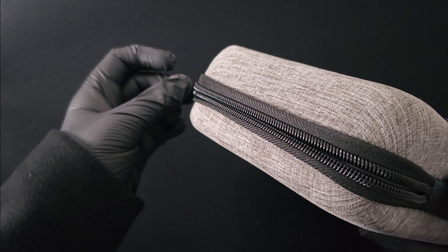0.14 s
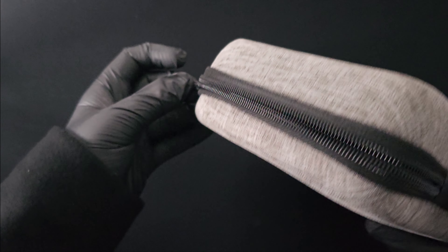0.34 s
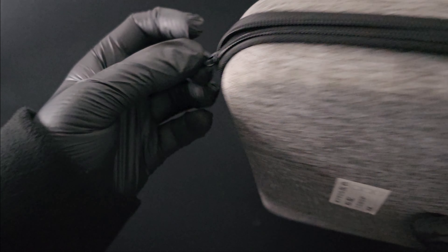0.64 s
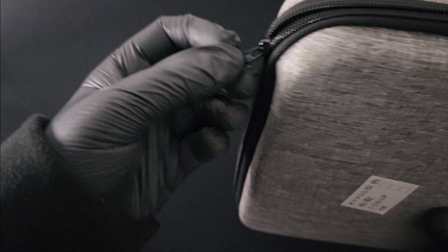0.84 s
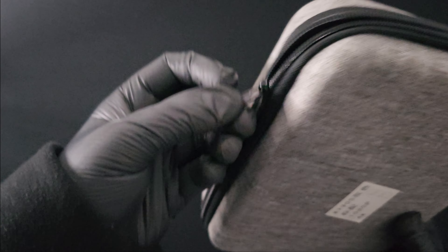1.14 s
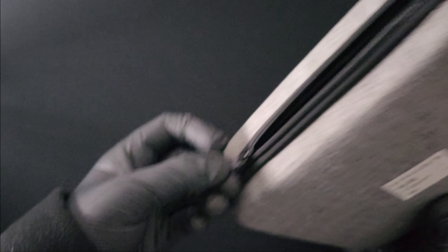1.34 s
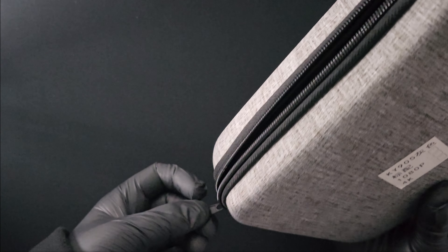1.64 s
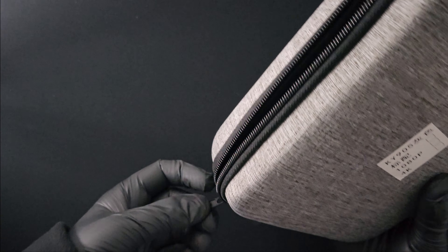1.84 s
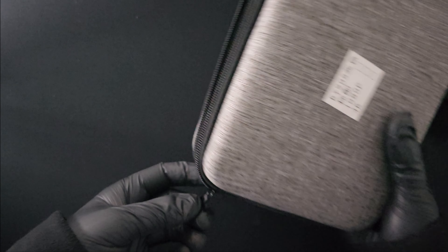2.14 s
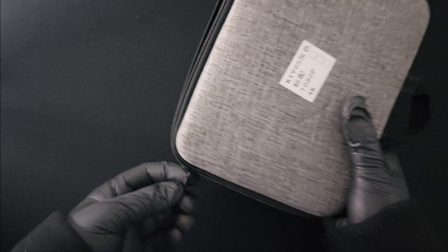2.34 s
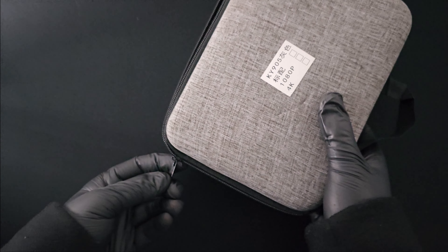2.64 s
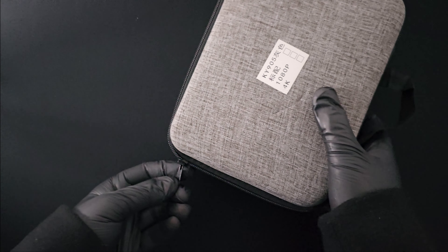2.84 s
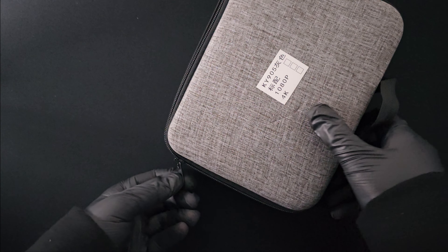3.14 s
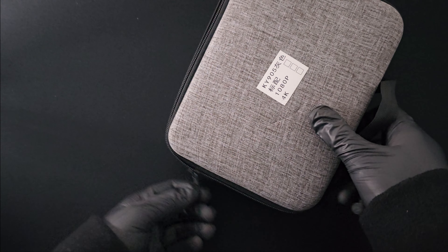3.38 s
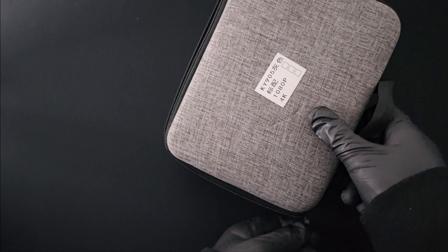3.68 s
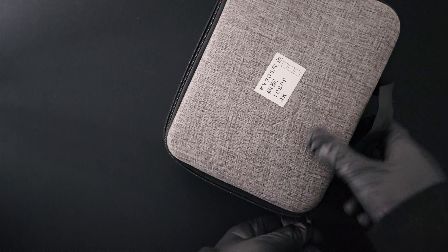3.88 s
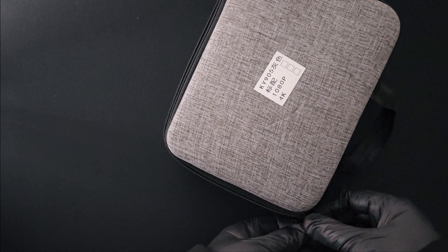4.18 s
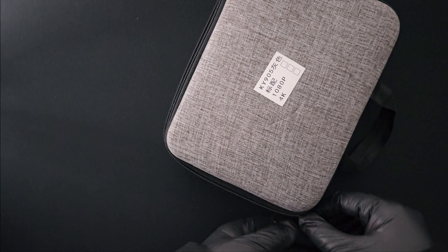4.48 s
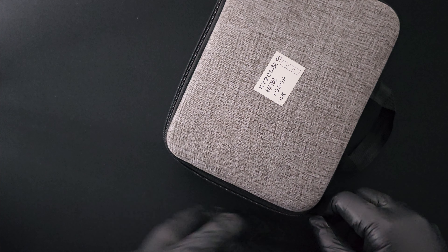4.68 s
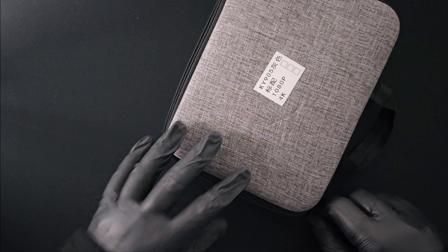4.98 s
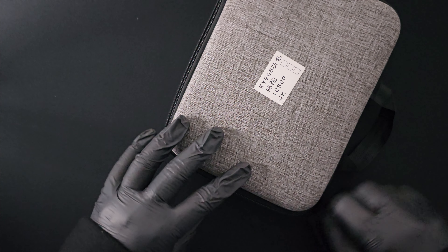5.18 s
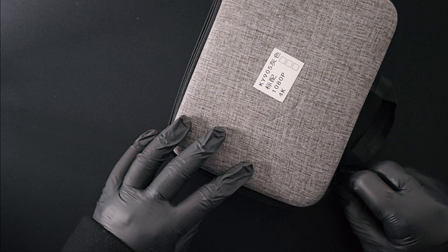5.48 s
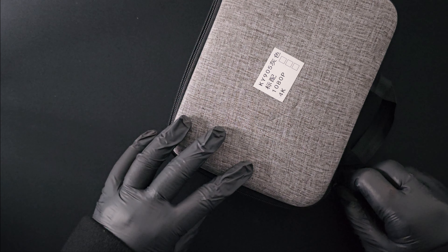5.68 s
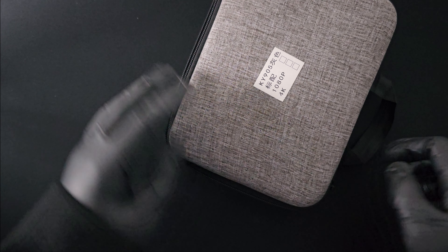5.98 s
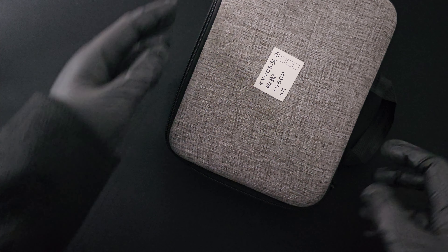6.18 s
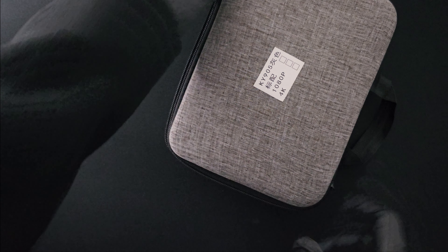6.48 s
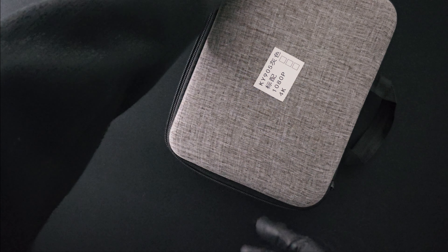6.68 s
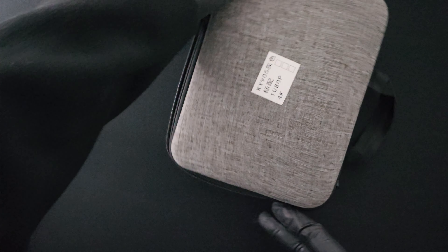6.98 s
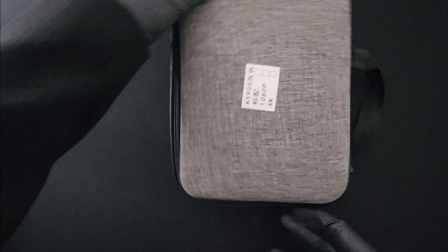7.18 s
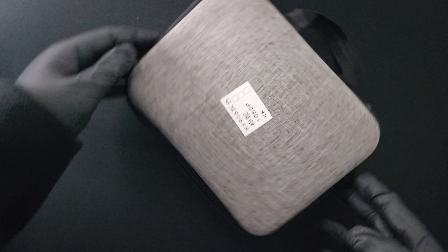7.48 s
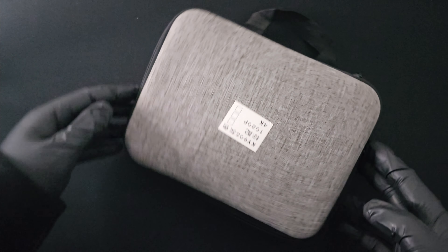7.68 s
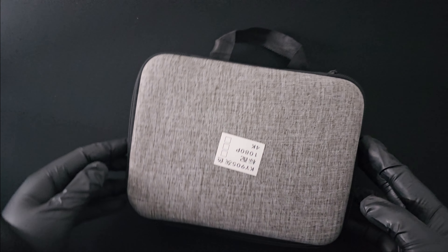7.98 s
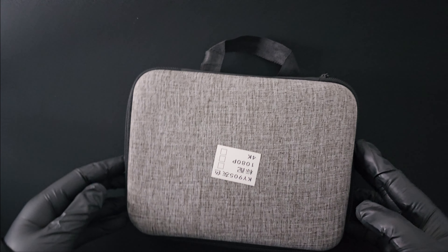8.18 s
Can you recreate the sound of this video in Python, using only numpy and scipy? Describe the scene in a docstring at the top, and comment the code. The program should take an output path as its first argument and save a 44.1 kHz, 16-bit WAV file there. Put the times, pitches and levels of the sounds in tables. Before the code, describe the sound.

Very close stereo sound in a quiet room: gloved hands brush a stiff cloth-covered case, the pull tab ticks, and a zipper rips open with a buzzing, rising rasp. The case thumps hollowly onto a table, a second brief zip follows sharp tab clacks, then a short, quickly fading third zip with rubbery glove rasp. Soft rustling leads to a smooth sliding drag as the case is turned.

```python
"""Unzipping a stiff case, close up

On a table in a quiet room, gloved hands unzip a stiff, fabric-covered case close to a stereo pair of microphones.
In three pulls the slider trips over the coil teeth: each kick drives the resonances of the hollow shell.
Shaped noise makes the cloth strokes, tape hiss and rubber rasp; decaying modes make the thumps and tab clicks.
At the end the case is slid round on the table; faint room tone and a deep hum lie underneath."""
import sys
import numpy as np
from scipy import signal
from scipy.fft import rfft, irfft, next_fast_len
from scipy.io import wavfile
from scipy.ndimage import uniform_filter1d

SR = 44100
rng = np.random.default_rng(int(sys.argv[2]) if len(sys.argv) > 2 else 0)


def transcribe(signal):
    """Save signal, clipped to [-1, 1], as a 16-bit WAV file at the path in sys.argv[1]."""
    frames = np.atleast_2d(signal).T
    limited = np.clip(frames, -1, 1)
    pcm = np.round(limited * 32767).astype(np.int16)
    wavfile.write(sys.argv[1], SR, pcm)


N = 367337


def amp(db):
    """Decibels to gain."""
    return 10 ** (np.asarray(db) / 20)


def evened(x):
    """Scales to unit rms."""
    return x / np.sqrt(np.mean(x ** 2) + 1e-20)


def steadied(x, size=1800):
    """Scales to unit rms over every short stretch of size samples."""
    power = np.mean(np.atleast_2d(x) ** 2, 0)
    return x / np.sqrt(abs(uniform_filter1d(power, size)) + 1e-9)


def read(points, hz):
    """Reads a spectrum on a log-frequency axis."""
    f, value = np.transpose(points)
    return np.interp(np.log(hz + 1), np.log(f + 1), value)


def add(mix, s, sound):
    """Adds a sound into the stereo mix at time s."""
    part = mix[:, round(s * SR):][:, :sound.shape[-1]]
    part += sound[..., :part.shape[1]]


def pair(size, likeness):
    """White noise for two microphones, partly alike."""
    left, other = rng.standard_normal((size, 2)).T
    c = np.clip(likeness, 0, 1)
    return np.array([left, c * left + np.sqrt(1 - c * c) * other])


def colour(x, points):
    """Gives x a spectrum at unit rms, falling away steeply below its first point."""
    size = next_fast_len(x.shape[-1] + 1024)
    hz = np.fft.rfftfreq(size, 1 / SR)
    gain = amp(read(points, hz)) * np.minimum(hz / points[0][0], 1) ** 2
    return evened(irfft(rfft(x, size) * gain, size)[..., :x.shape[-1]])


def resonate(x, peaks):
    """Passes x through parallel resonances (frequency [Hz], width [Hz], level [dB])."""
    return sum(amp(db) * signal.lfilter(*signal.iirpeak(hz, hz / width, SR), x) for hz, width, db in peaks)


def panel(x, peaks):
    """Meets each resonance twice, by the tape and by the wall, with deep valleys between."""
    out = 0
    for hz, width, db in peaks:
        once = resonate(x, [(hz, width, db)])
        out = out + resonate(once, [(hz, width, 0)])
    return out


def ring(modes, t):
    """Free decay of struck modes (frequency [Hz], level [dB], t60 [s])."""
    return sum(amp(db - 60 * t / t60) * np.sin(2 * np.pi * hz * t) for hz, db, t60 in modes)


def wander(t, step):
    """A random line that takes a new course every step, its turning points of unit spread."""
    turns = rng.standard_normal(400)
    return np.interp(t / max(step, .005), np.arange(len(turns)), turns)


EDGE_DB = 25.5  # drop at either end of a hand movement, besides the fade of first contact


def swell(length, attack, release):
    """A movement of the hand rises, holds and eases off: sample times [s] and level [dB]."""
    t = np.arange(0, length, 1 / SR)
    rising = np.maximum(1 - t / attack, 0)
    easing = np.maximum(1 - (length - t) / release, 0)
    touching = np.clip(4 * t / attack, .05, 1)  # the first contact fades in
    return t, 20 * np.log10(touching) - EDGE_DB * (rising ** 2 + easing ** 2)


def gated(x):
    """Softens both ends of a sound over 4 ms."""
    t = np.arange(x.shape[-1]) / SR
    return x * np.minimum(np.minimum(t, t[-1] - t) / .004, 1)


# The quiet room: (frequency [Hz], relative density [dB per Hz])
ROOM_TONE = [(15, -23.5), (25, -17.5), (52, -21.5), (75, -15.5), (164, -32.5), (221, -23), (359, -30),
             (648, -34), (895, -34), (15500, -57.5)]
# Deep hum: (frequency [Hz], rms level [dB])
HUM = [(32.3, -78.5), (48.4, -80)]
ROOM_TONE_DB = -76


def background():
    """Faint room tone is shaped noise; the deep hum under it is steady sines."""
    t = np.arange(N) / SR
    hum = sum(amp(db) * np.sqrt(2) * np.sin(2 * np.pi * (hz * t + rng.random())) for hz, db in HUM)
    return amp(ROOM_TONE_DB) * colour(pair(N, 0.27), ROOM_TONE) + hum


# Coarse scraping of cloth: (frequency [Hz], relative density [dB per Hz])
SCRAPE = [(350, -30), (600, 3), (850, 8.5), (1050, 4), (1350, 8), (1650, 2), (2200, 2), (3000, -31.5)]
# Fine hiss of the fibres: (frequency [Hz], relative density [dB per Hz])
FIBRE = [(1500, 0), (2500, 2), (4200, 3.5), (7500, -1), (10000, -14.5), (15000, -21)]
# The topmost treble of cloth and tape: (frequency [Hz], relative density [dB per Hz])
SHEEN = [(6000, -20), (9300, -8), (11500, -10), (13000, -11), (15800, -14.5)]


def rub(level, hollow, press_db, scrape_db, sheen_db, grain_db):
    """Countless fibres catch and slip; the coarser slips scrape and stir the hollow shell."""
    size = len(level)
    catches = amp(grain_db * evened(uniform_filter1d(rng.standard_normal(size), size=70)))
    shell_band = signal.butter(3, [115, 650], "band", fs=SR, output="sos")
    shell = signal.sosfilt(shell_band, resonate(catches * pair(size, 0.96), hollow))
    coarse = colour(catches ** 1.6 * pair(size, 0.24), SCRAPE)
    fine = catches * pair(size, 0.039)
    sound = amp(press_db) * steadied(shell, size=6000) + amp(scrape_db) * coarse
    sound += colour(fine, FIBRE) + amp(sheen_db) * colour(fine, SHEEN)
    return amp(level) * gated(sound)


# Gloves and sleeves stroking the cloth: (start [s], length [s], attack [s], release [s],
# fibre hiss [dB], pressure on the shell re hiss [dB], sheen re hiss [dB])
STROKES = [ (0.296, 0.31, 0.045, 0.34, -65.5, -12.5, 1), (0.334, 0.1, 0.011, 0.047, -91, 24, -5),
           (0.44, 0.082, 0.0094, 0.034, -84.5, 17, -3), (0.514, 0.18, 0.051, .08, -86.5, 11, -16),
           (0.589, 0.81, 0.012, 0.48, -75, -2.5, -4), (0.963, 0.6, 0.072, .12, -89.5, 15.5, 4),
           (1.523, 0.2, 0.026, 0.11, -69, 17.5, -3), (1.688, 0.35, 0.034, 0.24, -86, 10, -25),
           (1.921, 0.25, 0.033, 0.16, -70.5, -4.5, -2.5), (2.106, 0.26, 0.046, 0.18, -68.5, -4.5, -3.5),
           (2.248, 0.72, 0.1, 0.33, -80.5, 5.5, -6), (2.55, 0.052, 0.012, 0.021, -70, 12.5, -4),
           (2.579, 0.14, 0.02, 0.24, -74, 2.5, 2), (2.811, 0.51, 0.19, 0.17, -58.5, -9.5, -5.5),
           (3.202, 0.66, 0.023, 0.21, -72.5, 15, -8), (3.784, 0.22, 0.032, 0.025, -73.5, 6, -7),
           (3.892, 0.27, 0.042, 0.18, -66.5, -6, 2.5), (4.197, 0.47, 0.061, 0.1, -76.5, -1, 3),
           (4.64, .27, 0.04, 0.064, -71.5, -5.5, -4), (4.831, 0.47, 0.073, 0.46, -64.5, -11, 0),
           (5.106, 0.35, 0.0065, 0.042, -74.5, 1, 2), (5.202, 0.245, 0.14, 0.098, -58.5, -7, -7),
           (5.311, 0.16, 0.042, 0.16, -47.5, -30, 2), (5.469, 0.18, 0.03, 0.08, -82, 7, 9),
           (5.595, 0.38, 0.066, 0.057, -82, 3, -7.5), (5.782, 0.14, 0.13, 0.1, -66, 2, 6),
           (5.883, 0.4, 0.026, 0.17, -78, 1, -6), (6.065, 0.35, 0.09, 0.084, -74.5, -2.5, -1),
           (6.23, 0.65, 0.22, 0.13, -67, -9.5, -4), (6.793, 0.19, 0.061, 0.079, -74.5, -2, 0),
           (6.875, 0.18, 0.027, 0.033, -95.5, 25.5, -4), (6.981, 0.098, 0.015, 0.089, -82, 22, -5), ]
# A pinched pull tab drags briefly along the tape: the columns of STROKES
TUGS = [(4.079, .161, .015, .035, -68, -1, 13.5), (4.59, .21, .02, .04, -83, 11, 0),
        (5.855, .12, .012, .09, -80, 11, 0)]
# Shell under a rubbing hand while lifted: (frequency [Hz], width [Hz], level [dB])
LIFTED_SHELL = [(216, 19, 9.5), (278, 60, 6), (380, 67, -3)]
# The same shell resting on the table: (frequency [Hz], width [Hz], level [dB])
RESTING_SHELL = [(150, 12, 8.5), (211, 6.5, 6), (270, 36, -0.5), (358, 88, -6.5), (430, 53, -10.5)]
# Resonances under the pinched tab: (frequency [Hz], width [Hz], level [dB])
TAB = [(391, 66, 3), (425, 10, -5)]
RESTING_S = 2.56  # strokes from here on find the case touching the table
SCRAPE_DB, SCRAPE_PER_PRESSURE = -1.5, 0.47  # scraping re hiss at 0 dB pressure; dB gained per dB of pressure
UNEVEN_DB, UNEVEN_S = 2, 0.02653  # a rubbing hand catches and lets go


def stroke(row, hollow, grain_db):
    """One uneven stroke over the cloth; the harder it presses, the more it scrapes."""
    start, length, attack, release, hiss_db, press_db, sheen_db = row
    t, effort = swell(length, attack, release)
    level = hiss_db + effort + UNEVEN_DB * wander(t, UNEVEN_S)
    scrape_db = SCRAPE_DB + SCRAPE_PER_PRESSURE * press_db
    return start, rub(level, hollow, press_db, scrape_db, sheen_db, grain_db)


# Pull tab and single teeth clicking: (time [s], level [dB], bright snap re clack, before a fixed trim [dB])
CLICKS = [(0.333, -81, 18), (0.4, -56, -14), (0.464, -60.5, 6), (0.68, -60.5, 6), (0.783, -59.5, 5.5),
          (1.095, -67, -12), (1.163, -53.5, -9), (1.759, -66, -24), (1.954, -62, -15), (1.972, -53.5, -9),
          (2.149, -57, 3), (2.177, -51, -17), (2.189, -67.5, 18), (3.38, -44, -3.5), (3.404, -45.5, 1.5),
          (3.421, -48.5, 3.5), (3.435, -56, 6), (3.447, -60, -6), (3.783, -42, -7), (3.799, -39.5, -7),
          (3.974, -55.5, -7), (4.435, -67, -8), (4.602, -62, -15), (4.655, -60, -5), (4.665, -56, -10),
          (5.869, -61.5, 2), (6.98, -68, 11)]
# Dry clack of the wall, before random shading: (frequency [Hz], level [dB], t60 [s])
CLACK = [(820, 4, .02), (1020, 8, .014), (1300, 8, .016), (1560, 7, .016), (1930, 4, .014)]
# Hiss of the zipper tape: (frequency [Hz], relative density [dB per Hz])
TAPE = [(600, -43), (1500, 3), (2200, 7), (3500, 4.5), (5000, 1.5), (7000, -3), (10000, -6), (15500, -9.5)]


def click(s, db, snap_db):
    """The metal tab snaps against the slider and the wall answers with a dry clack."""
    t = np.arange(int(.08 * SR)) / SR
    shades = rng.standard_normal((len(CLACK), 2))
    # no two clacks share quite the same pitches and levels
    modes = [(hz * (1 + 0.09 * a), level + 3 * b, t60) for (hz, level, t60), (a, b) in zip(CLACK, shades)]
    clack = ring(modes, t) * (1 - np.exp(-t / 0.0028))
    snap = colour(pair(len(t), 0.065), TAPE) * np.exp(-t / 0.0077)
    return s, amp(db) * (amp(2.5) * clack / abs(clack).max() + amp(snap_db - 8.5) * snap)


# Slider creeping over the coil: (start [s], length [s], level [dB], hiss re grinding [dB])
CREEPS = [(.385, 0.023, -65.5, -14), (.583, 0.056, -73, -14), (.68, 0.031, -74, -18), (.755, .075, -76, -2),
          (.875, 0.1, -72, -6), (2.553, 0.04, -58.5, -18), (2.6, 0.048, -71, -18), (2.638, 0.032, -63, -20),
          (4.63, 0.044, -72, -5)]
# Coil under a creeping slider: (frequency [Hz], width of each of two passes [Hz], level [dB])
COIL = [(607, 220, -6.5), (880, 160, 6.5), (1245, 240, 6), (2000, 850, -10.5)]


def creep(row, grain_db):
    """The slider grinds a little way over the coil in a burst of tiny slips."""
    start, length, db, hiss_db = row
    t, effort = swell(length, .3 * length, .3 * length)
    slips = amp(grain_db * wander(t, .005)) * pair(len(t), .5)
    grinding = evened(panel(slips, COIL))
    return start, amp(db + effort) * gated(grinding + amp(hiss_db) * colour(slips, FIBRE))


def travelling(x, peaks, rate):
    """Each wall resonance swells and fades at random as the slider passes its nodes."""
    teeth = np.cumsum(rate) / SR
    return sum(amp(3 * wander(teeth, 12)) * panel(x, [peak]) for peak in peaks)


TURN_S = 0.0039  # time the slider takes to pass onto the next stretch of wall


def along(wall, drive, times, rate, buzz, rattle):
    """The slider passes from one stretch of wall to the next; low modes buzz and high ones rattle."""
    reached = [1] + [np.clip((times - row[0]) / TURN_S + .5, 0, 1) for row in wall[1:]] + [0]
    out = 0
    for k, (_, buzz_db, rattle_db, peaks) in enumerate(wall):
        low = panel(drive, [p for p in peaks if p[0] < 700])
        high = travelling(drive, [p for p in peaks if p[0] >= 700], rate)
        share = np.sqrt(abs(reached[k] - reached[k + 1]))
        both = amp(buzz + buzz_db) * steadied(low) + amp(rattle + rattle_db) * steadied(high)
        out = out + share * both
    return out


# The wall sings out: (start [s], length [s], frequency [Hz], width of each of two passes [Hz], # level [dB],
# not scaled by the force of the pull)
SINGS = [(1.36, 0.046, 495, 149, -40), (1.445, 0.056, 878, 225, -33.5), (1.45, 0.055, 447, 90, -39),
         (3.574, 0.028, 1030, 90, -40), (3.606, 0.046, 1494, 90, -45.5), (3.674, 0.028, 1510, 90, -47),
         (3.682, 0.028, 290, 110, -40), (5.3, 0.022, 1150, 90, -46), (5.308, 0.026, 442, 130, -37.5)]
SING_SWELL_S = 0.021


def singing(drive, start, end):
    """A wall resonance flares up while the teeth keep step with it."""
    out = np.zeros_like(drive)
    for s, length, hz, width, db in SINGS:
        if start < s < end:
            t, effort = swell(length, SING_SWELL_S, SING_SWELL_S)
            tone = panel(drive, [(hz, width, 0)])[:, round((s - start) * SR):][:, :len(t)]
            add(out, s - start, amp(db + effort) * evened(tone))
    return out


# Slider speed in each of the three pulls: (time [s], speed [teeth/s])
SPEED_1 = [(1.16, 75), (1.187, 215), (1.21, 222), (1.232, 188), (1.28, 205), (1.31, 218), (1.34, 262),
           (1.368, 335), (1.4, 385), (1.45, 446), (1.468, 456), (1.487, 414), (1.5, 442), (1.522, 430),
           (1.54, 190), (1.57, 262), (1.62, 270), (1.66, 220), (1.74, 110)]
SPEED_2 = [(3.385, 60), (3.44, 85), (3.48, 125), (3.52, 190), (3.62, 360), (3.648, 380), (3.72, 245),
           (3.77, 110), (3.91, 60)]
SPEED_3 = [(5.265, 167), (5.322, 382), (5.345, 230), (5.49, 80)]
# Stretches of wall under the slider: (from [s], buzz [dB], rattle [dB],
# resonances as (frequency [Hz], width of each of two passes [Hz], level [dB]))
WALL_1 = [(1.16, 2.8, 4, [(249, 176, 11.5), (372, 140, 2), (1000, 260, 1), (1310, 230, 2),
          (1800, 700, -14.5)]), (1.366, 3.9, 2.5, [(396, 170, -1), (600, 200, 4), (794, 240, 3.5),
          (1160, 260, 2), (1415, 200, 3.5), (1730, 700, -8.5)]), (1.5, 4, -7, [(418, 150, -5),
          (610, 200, -2), (875, 250, -1), (1330, 350, 6), (1850, 700, -15)]),
          (1.528, 4.7, 1.5, [(165, 90, 1.5), (250, 90, 2.5), (420, 220, -9), (840, 250, 4), (1270, 400, 2),
          (1790, 700, -11)])]
WALL_2 = [(3.385, 6, 0.42, [(141.3, 14.5, 7), (279.3, 220, -2.5), (407, 122, -6), (560, 300, -14.5),
          (792, 65, 5.5), (1035, 200, 4.5), (1445, 310, 4), (1890, 860, -6)])]
WALL_3 = [(5.265, 1.6, 0, [(265, 105, -1), (423, 125, -5), (560, 180, -14), (810, 160, 0.5),
          (1160, 126, 4.5), (1420, 560, -2.5), (1950, 1200, -14)]), (5.337, 4, 0, [(161, 70, 2.5),
          (260, 103, -2), (416, 200, -8), (830, 200, 0), (1300, 500, -2), (1950, 1200, -8)])]
# Mesh of the teeth, a row per pull: (force of the weaker row from 350 teeth/s up [ratio],
# timing jitter at 300 teeth/s [share of a tooth], waver [share of the speed], spread of tooth force [dB])
TEETH = [(.3, .026, .022, 2), (.55, .04, .03, 3.5), (.6, .09, .06, 3)]
# The hand's effort, a row per pull: (attack [s], release [s], force [dB], sag [dB/s], tape hiss re force [dB],
# loss of rattle once slowed by an octave or more [dB], loss of buzz far above 320 teeth/s [dB])
PULLS = [(0.07, 0.25, -44, 11, -0.5, 2.5, 2.5), (0.062, 0.13, -41, 21.5, 0, 0, 8.5),
         (0.035, 0.26, -38, 81, -15, 33, 1)]
BUZZ_DB_PER_OCTAVE, RATTLE_DB_PER_OCTAVE, HISS_DB_PER_OCTAVE = 4.5, 6, 10  # gain per doubling of speed
RATTLE_POWER, HISS_POWER = 0.85, 1.34  # share of the effort's swell and sag in dB; the buzz follows it 1:1


def zip_pull(speed, pull, wall, teeth, sheen_db):
    """Teeth of the two rows part in turn; each kicks the wall and snaps with a short hiss."""
    attack, release, force_db, sag, hiss_db, slack_db, stiff_db = pull
    weak_side, jitter, waver, spread_db = teeth
    start, end = speed[0][0], speed[-1][0]
    t, effort = swell(end - start, attack, release)
    effort = effort - sag * t
    pace = np.interp(start + t, *np.transpose(speed))
    octaves = np.log2(pace / 300)

    fast = 1 - 1 / (1 + (pace / 320) ** 8)  # a fast slider shakes the low modes less
    buzz = effort + BUZZ_DB_PER_OCTAVE * octaves - stiff_db * fast
    slack = np.minimum(np.maximum.accumulate(octaves) - octaves, 1)  # the tape loosens as the slider brakes
    rattle = RATTLE_POWER * effort + RATTLE_DB_PER_OCTAVE * octaves - slack_db * slack
    smooth_octaves = uniform_filter1d(octaves, size=4000)
    hiss = HISS_POWER * effort + HISS_DB_PER_OCTAVE * smooth_octaves + hiss_db

    slow_noise = uniform_filter1d(uniform_filter1d(rng.standard_normal(len(t)), size=500), size=500)
    rate = pace * (1 + waver * evened(slow_noise))
    at = np.flatnonzero(np.diff(np.floor(np.cumsum(rate) / SR)))  # one sample index per tooth
    late, force, snap = rng.standard_normal((len(at), 3)).T
    # a slow slider stumbles from tooth to tooth, a fast one runs evenly and sings
    tooth_rate = rate[at]
    stumble = np.minimum(300 / tooth_rate, 1.4)
    at = np.clip(at + jitter * stumble ** 2 * late * SR / tooth_rate, 0, len(t) - 1).astype(int)
    kicks, snaps = np.zeros((2, len(t)))
    # the weaker row is read at the shifted tooth times
    weaker = weak_side ** np.minimum(rate[at] / 350, 1) ** 2
    kicks[at] = amp(spread_db * force) * np.where(np.arange(len(at)) % 2, weaker, 1)
    snaps[at] = kicks[at] * amp(0.57 * snap)

    # each tooth scrapes through the slider, dying with a 15 ms time constant
    scuff = steadied(signal.lfilter([1], [1, -np.exp(-1 / (0.015 * SR))], snaps))
    drive = steadied(kicks) + .25 * scuff * pair(len(t), .1)
    grit = (scuff + .5) * pair(len(t), .1) + .8 * steadied(snaps)
    brightness = amp(sheen_db) * amp(1.4 * (hiss - hiss.max()))  # a fast slider brightens the tape hiss
    tape = colour(grit, TAPE) + brightness * colour(grit, SHEEN)
    shell = along(wall, drive, start + t, rate, buzz, rattle)
    sound = amp(force_db) * (shell + amp(hiss) * steadied(tape) + 0)
    sound = sound + singing(drive, start, end)
    left, right = gated(sound)
    return start, np.array([left, np.roll(right, shift=7)])  # the zipper is nearer the left microphone


# Case meeting table or hand: (time [s], level [dB], hardness as a corner [Hz], table re case modes [dB])
KNOCKS = [(1.53, -30.5, 103, -11), (2.572, -37, 49.7, 3), (2.597, -29.5, 140, -30),
          (2.6097, -33.5, 130, -41), (3.165, -14, 756, -4.5), (3.1862, -18.5, 422, -6),
          (3.208, -22, 327, -20), (3.978, -41.5, 131, -24), (4.519, -41.5, 203, -34),
          (5.116, -39.5, 500, -22), (5.866, -56, 490, -15), (8.239, -46, 139, -38)]
# Modes of the hollow case: (frequency [Hz], level [dB], t60 [s])
CASE = [(148.5, -1.5, 0.3), (213.5, -5, 0.17), (269, -0.5, 0.23), (295, 1, 0.08), (382, -8, 0.17),
        (406, -14, .13), (462, -12, 0.17), (511, -15, 0.13), (710, -17, 0.05), (800, -12, 0.04),
        (870, -18, 0.1), (1300, -19, 0.06)]
# Modes of the table: (frequency [Hz], level [dB], t60 [s])
TABLE = [(37.5, -10, .25), (92, -4, 0.41)]
# Cloth crushed by a blow: (frequency [Hz], relative density [dB per Hz])
CRUNCH = [(330, -6.5), (480, -16), (750, -1.5), (1300, -5.5), (2500, -1.5), (3700, 8), (5200, 5),
          (6200, -14.5), (15000, -18)]
CRACK_S, CRACK_DB = .0042, -24  # time of the crack's peak [s]; its level at a 750 Hz corner [dB]


def knock(s, db, corner_hz, weight_db):
    """A blow rings case and table and crushes cloth; a soft contact builds slowly and leaves only low modes."""
    t = np.arange(int(.6 * SR)) / SR
    contact = 1 - np.exp(-t / (.0015 * 750 / corner_hz))
    case = signal.lfilter(*signal.butter(2, 95, "high", fs=SR), ring(CASE, t))
    body = (case + amp(weight_db) * ring(TABLE, t)) * contact
    cloth = colour(pair(len(t), 0.2), CRUNCH)
    crunch = 1.3 * cloth * np.exp(-t / 0.018)
    # the cloth cracks when a hard blow has pressed it flat
    crack = cloth * (t / CRACK_S) ** 3 * np.exp(3 * (1 - t / CRACK_S))
    blow = signal.lfilter(*signal.butter(2, corner_hz, fs=SR), 0.55 * body + amp(2.5) * crunch)
    bright = (corner_hz / 750) ** 2 * (amp(-30.0) * crunch + amp(CRACK_DB) * crack)
    return s, amp(db) * (blow + bright)


# Rubber chafing on the lid: (start [s], length [s], attack [s], release [s], level [dB])
GLOVE = [(5.105, 0.51, 0.05, 0.19, -66), (5.49, 0.16, 0.064, 0.084, -72.5), (5.786, 0.13, 0.049, .06, -66)]
# Rubber on the weave: (frequency [Hz], width of each of two passes [Hz], level [dB])
RASP = [(3230, 190, -2), (3910, 440, 0.5), (4500, 480, 0.5), (5200, 420, -2.5), (6260, 3100, -7.5)]


def chafe(row, grain_db):
    """Rubber sticks and slips on the weave with a rough rasp."""
    start, length, attack, release, db = row
    t, effort = swell(length, attack, release)
    slips = amp(grain_db * wander(t, .005)) * pair(len(t), .3)
    return start, amp(db + effort) * gated(evened(panel(slips, RASP)))


# Case dragged round on the table, its speed given as the level of its hiss: (time [s], level [dB])
SLIDE = [(6.96, -81), (6.978, -69.5), (7.062, -52), (7.15, -50), (7.362, -48.5), (8.316, -67), (8.33, -66)]
# The dragged shell: (frequency [Hz], width [Hz], level [dB])
DRAGGED_SHELL = [(146, 9, 11), (214, 16, 2), (285, 70, 0), (375, 50, -9)]
ROCK_DB, ROCK_S = 3, .06  # the dragged case rocks a little


def drag(press_db, scrape_db, sheen_db, grain_db, weight_share):
    """The case rocks as it turns on the table; its weight keeps the shell droning as the hiss fades."""
    s, db = np.transpose(SLIDE)
    t = np.arange(0, s[-1] - s[0], 1 / SR)
    level = np.interp(s[0] + t, s, db)
    pressure = press_db + weight_share * (level.max() - level) + ROCK_DB * wander(t, ROCK_S)
    return s[0], rub(level, DRAGGED_SHELL, pressure, scrape_db, sheen_db, grain_db)


# Decay of the room: (frequency [Hz], t60 [s])
ROOM_DECAY = [(100, 0.27), (400, 0.24), (2000, 0.17), (8000, 0.068), (16000, 0.021)]


def room(x):
    """Sparse reflections off table and walls, the treble dying first."""
    taps = rng.choice([-1., 1.], (2, SR // 2)) * (rng.random((2, SR // 2)) < .08)
    taps[:, :130] = 0  # nothing returns in the first 3 ms
    hz, t, z = signal.stft(taps, SR, nperseg=256)
    apart = np.clip(hz / 900, 0, 1)[:, None] ** 2  # long waves reach both microphones alike
    z[1] = np.sqrt(1 - apart) * z[0] + np.sqrt(apart) * z[1]
    decay = amp(-60 * t / read(ROOM_DECAY, hz)[:, None])
    tail = signal.istft(z * decay, SR, nperseg=256)[1]
    return signal.fftconvolve(x, tail / np.linalg.norm(tail[0]), axes=1)[:, :N]


def scene():
    """Zipper, handling and knocks, a little left of centre before the close pair."""
    near, blows = np.zeros((2, 2, N))
    add(near, *zip_pull(SPEED_1, PULLS[0], WALL_1, TEETH[0], sheen_db=-9))
    add(near, *zip_pull(SPEED_2, PULLS[1], WALL_2, TEETH[1], sheen_db=-18))
    add(near, *zip_pull(SPEED_3, PULLS[2], WALL_3, TEETH[2], sheen_db=-22))
    for row in STROKES:
        shell = RESTING_SHELL if row[0] > RESTING_S else LIFTED_SHELL
        add(near, *stroke(row, shell, grain_db=1.0))
    for row in CREEPS:
        add(near, *creep(row, grain_db=4))
    for row in TUGS:
        add(near, *stroke(row, TAB, grain_db=-1.0))
    add(near, *drag(press_db=-8.5, scrape_db=-9.0, sheen_db=-3.5, grain_db=0.96, weight_share=0.19))
    for row in GLOVE:
        add(near, *chafe(row, grain_db=3))
    for row in CLICKS:
        add(near, *click(*row))
    for row in KNOCKS:
        add(blows, *knock(*row))
    wet = room(amp(-8) * near + amp(-15) * blows)
    handling = (near + wet) * amp([[1.2], [-1.2]])  # left and right gains in dB
    return handling + blows * amp([[.5], [-.5]]) + background()


EDGE_HZ = 15830


def record(dry):
    """The recorder's band limit: a steep low-pass filter."""
    low_pass = signal.firwin(1023, EDGE_HZ, window=("kaiser", 9), fs=SR)
    return signal.oaconvolve(dry, low_pass[None], "same")


dry = scene()
out = record(dry)
transcribe(out)
```